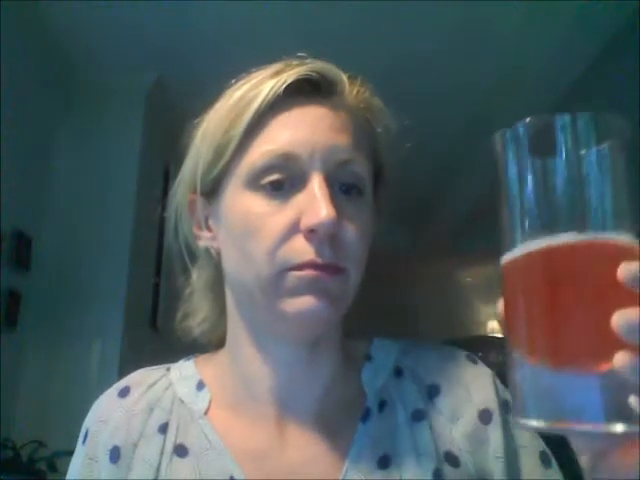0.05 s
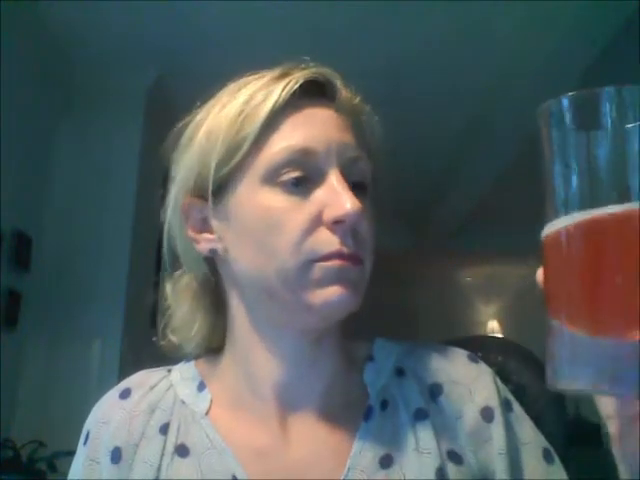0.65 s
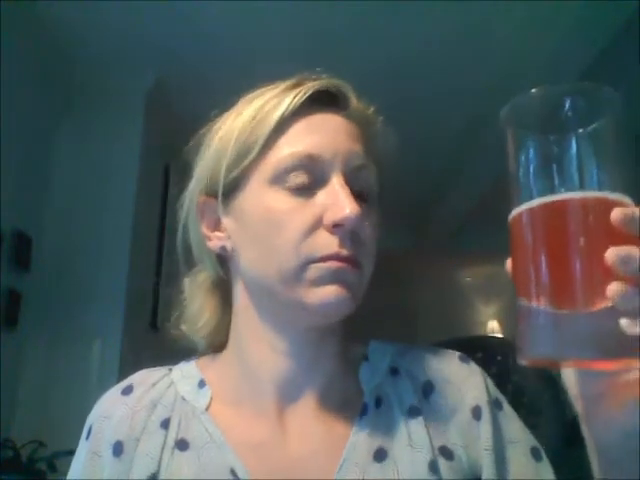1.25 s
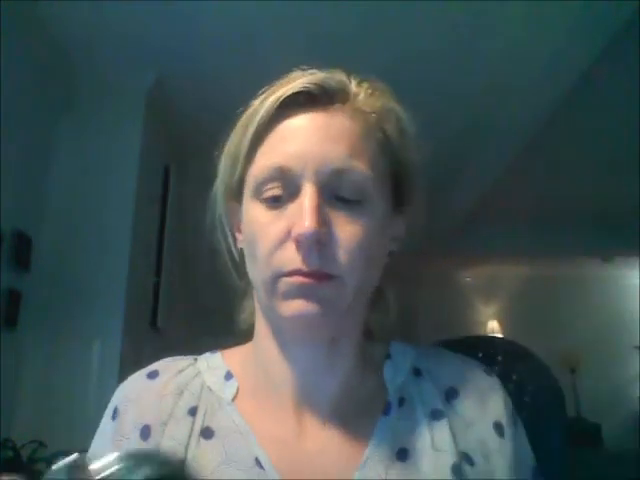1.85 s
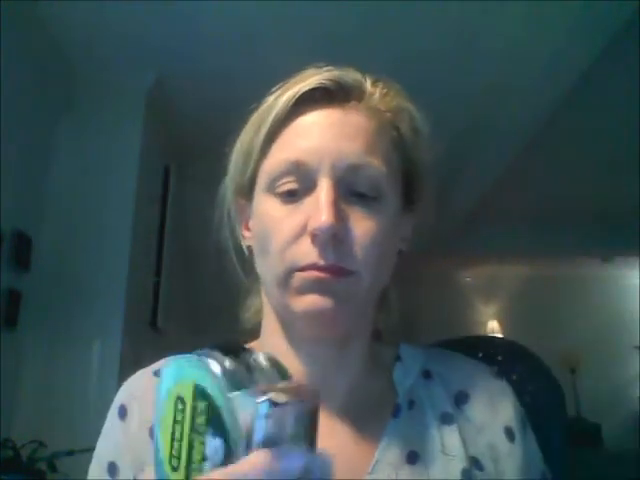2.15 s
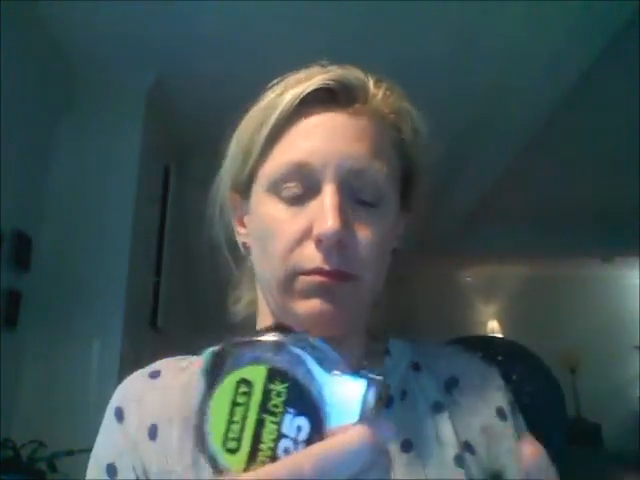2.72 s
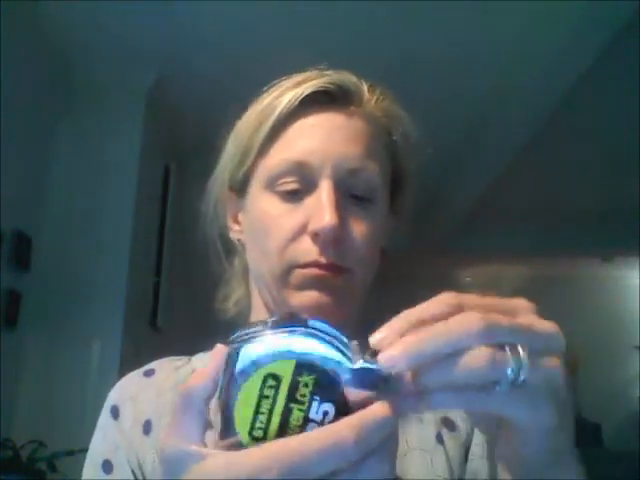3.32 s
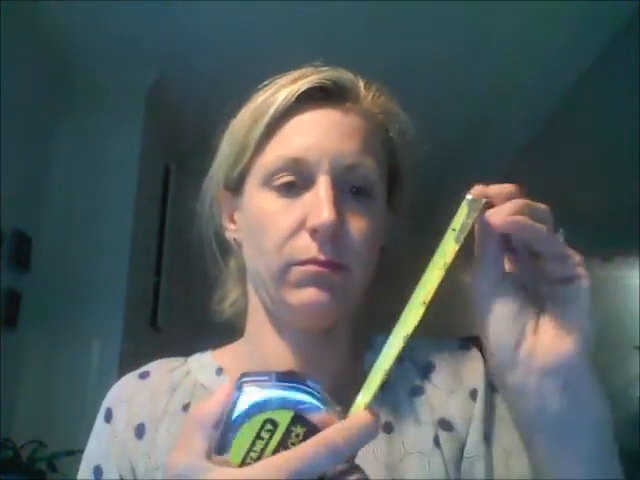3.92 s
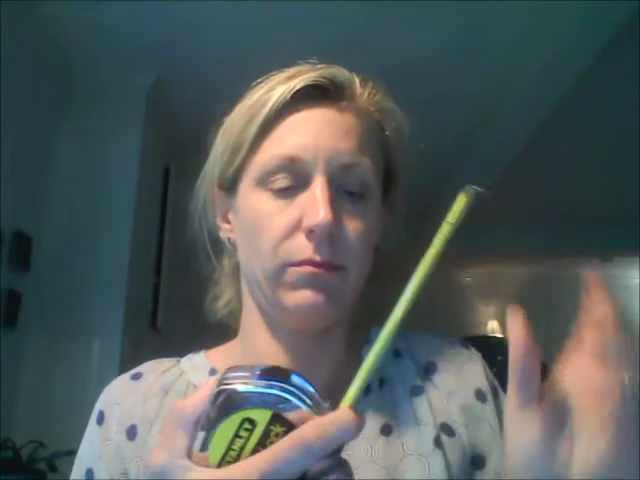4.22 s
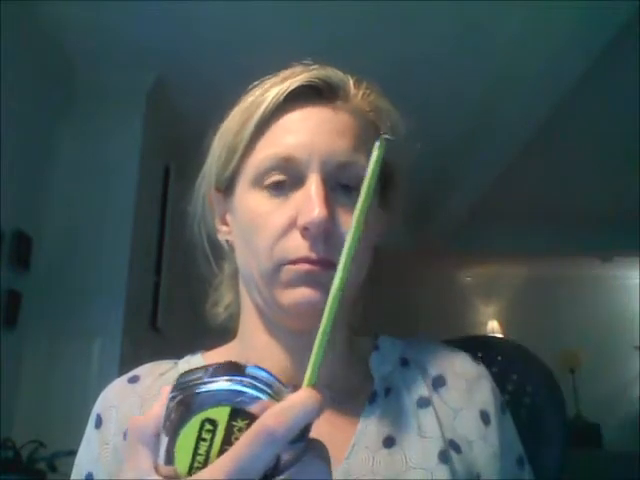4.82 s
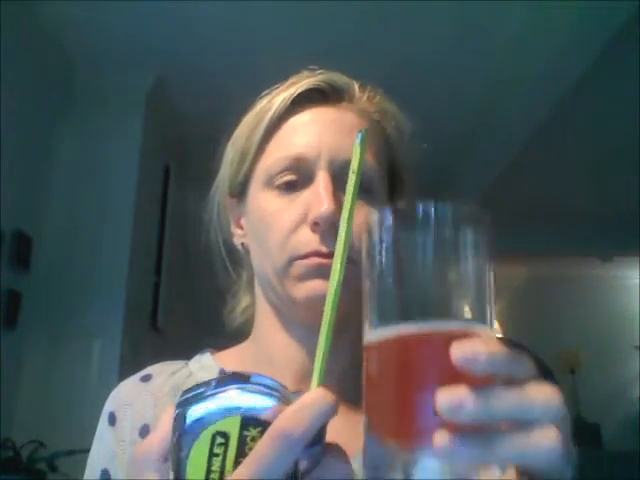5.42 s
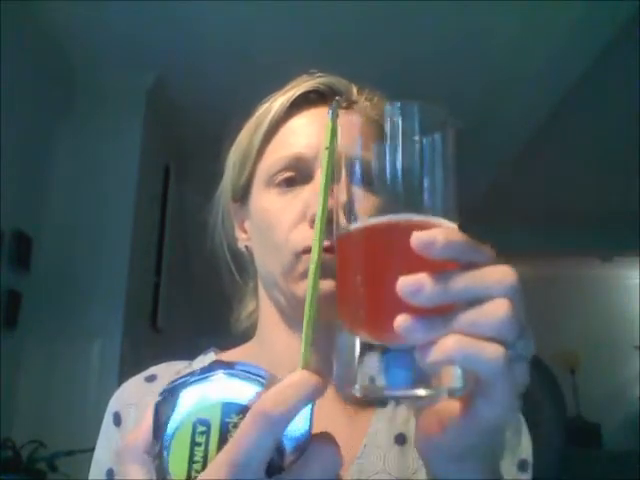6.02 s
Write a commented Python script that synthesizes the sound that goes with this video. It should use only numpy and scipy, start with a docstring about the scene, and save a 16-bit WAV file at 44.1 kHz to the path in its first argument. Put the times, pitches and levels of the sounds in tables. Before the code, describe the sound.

Close to a small computer microphone in a quiet room, light handling gives way to a loud double knock that briefly rings a table top. Next comes the rattling scrape of a metal tape measure being drawn out, with bright clacks and clicks. Things go nearly still, a lifted glass hums faintly, and the steel blade strikes it with a sharp clatter, followed by lighter taps and small squeaks.

```python
"""A steel tape measure handled at a table in a quiet room, close to a small computer microphone.
Fingers tick and brush; two heavy thumps ring the table top and the room (2.1, 2.3 s).
One pull draws the blade, scraping and clacking in the mouth of its case (3.2-4 s).
A drinking glass hums as it is lifted (5.3 s); the blade clatters, rubs and squeaks on it (5.7-6.1 s)."""
import sys
import numpy as np
from scipy import signal
from scipy.fft import rfft, irfft
from scipy.io import wavfile

SR = 44100
rng = np.random.default_rng(int(sys.argv[2]) if len(sys.argv) > 2 else 0)


def transcribe(signal):
    """Save signal, clipped to [-1, 1], as a 16-bit WAV file at the path in sys.argv[1]."""
    frames = np.atleast_2d(signal).T
    limited = np.clip(frames, -1, 1)
    pcm = np.round(limited * 32767).astype(np.int16)
    wavfile.write(sys.argv[1], SR, pcm)


N = 272139
TIME = np.arange(N) / SR
AGE = TIME[:SR // 2]

# blade knocks in the case mouth: t/s, case level/dB, case f/Hz, steel level/dB, steel f/Hz
CLACKS = [(3.2414, -47, 1100, -51.5, 3430), (3.2490, -37, 950, -47.5, 3200),
          (3.2560, -39.5, 950, -44, 3370), (3.346, -52.5, 1200, -51, 5340), (3.3535, -37, 1000, -43, 3160),
          (3.3865, -41, 1200, -51.5, 3400), (3.425, -48.5, 1000, -37.5, 3300),
          (3.4485, -38.5, 1100, -28, 4830), (3.455, -34, 750, -37.5, 3400), (3.49, -59.5, 1300, -31, 4600),
          (3.503, -56, 1300, -26, 3970), (3.5390, -16, 1900, -9.5, 5023), (3.5420, -21, 1700, -17.5, 4700),
          (3.564, -34, 850, -44.5, 3003), (3.74, -44.5, 2600, -43, 3600), (3.7516, -42, 2600, -29.5, 4900),
          (3.9770, -48, 1300, -56, 2794)]
# case and coiled blade: f/Hz, level/dB, t60/s
CASE_MODES = [(514, -13, 0.051), (586, -17.5, .16), (715, -12, 0.0606), (1457, -11.5, .024),
              (1842, -15, 0.2), (2140, -9.5, .025), (2270, -15.5, .075), (2980, -10.5, 0.12),
              (3270, -8, .035), (3570, -16.5, 0.18), (4200, -13, .035), (4460, -12, .03), (5000, -13, .037),
              (5580, -8.5, .05)]
# case mouth resonances: f/Hz, width/Hz, level/dB
MOUTH_BANDS = [(540, 170, 4.5), (733.4, 170, 0), (1467, 120, 0.5), (1755, 260, 7.5), (2040, 210, 0),
               (2890, 330, 4), (3280, 260, 4), (3577, 350, 1), (4236, 190, -0.5), (4600, 670, 1.5),
               (5067, 360, 0), (5870, 460, -3), (6250, 400, -6.5), (7000, 170, -6.5)]
# envelope of the pull: t/s, rattle gain/dB, zing gain/dB
PULL = [(3.33, -63.5, -72), (3.355, -52, -62), (3.40, -49, -55), (3.44, -41, -37), (3.468, -32.5, -40),
        (3.483, -43, -38.5), (3.494, -47, -28.5), (3.525, -42.5, -30), (3.552, -30, -28),
        (3.585, -43.5, -55.5), (3.70, -58, -62), (3.85, -75, -75.5)]
# flexing steel: f/Hz
ZING_HZ = [3230, 3580, 4400, 4620, 5010]
# lone partials of blade or glass: t/s, level/dB, f/Hz, t60/s
PINGS = [(1.389, -52, 4840, 0.11), (3.4478, -21.5, 2985, 0.058), (3.539, -18, 4580, 0.021),
         (3.539, -23.5, 680, 0.038), (3.551, -28, 5760, 0.082), (3.563, -29, 2870, 0.053),
         (3.703, -43, 2280, 0.18), (3.7515, -12.5, 3574, 0.022), (3.7555, -14, 3753, .024),
         (5.667, -27.5, 458, 0.12), (5.667, -18.5, 2072, 0.088), (5.695, -21, 2124, 0.19),
         (5.739, -41, 5260, 0.093), (5.815, -34, 1736, 0.16), (5.878, -32, 2230, .08),
         (5.96, -33, 1787, 0.057), (5.958, -39.5, 3850, 0.13), (5.96, -44, 4480, .09),
         (6.033, -36.5, 3107, 0.048)]
# blade taps on the glass: t/s, level/dB, centre f/Hz, relative crack level/dB, crack t60/s
GLASS_TAPS = [(5.6674, -20.5, 1710, -6.5, 0.034), (5.677, -11.5, 2500, 3, 0.0028),
              (5.687, -31, 1900, -5, 0.031), (5.6945, -17.5, 2570, -11.5, 0.054),
              (5.7003, -19.5, 2300, -10.5, .02), (5.7230, -29, 1310, -7, .03),
              (5.8143, -36.5, 2640, -4, 0.022), (5.8785, -47.5, 2330, 1, .009),
              (5.959, -35.5, 3160, -9, 0.037), (6.026, -33.5, 2280, -4, 0.017),
              (6.0317, -29.5, 3300, -1, 0.017)]
# glass and free blade: f/Hz, level/dB, t60/s
GLASS_MODES = [(455, -21, .08), (1045, -18, .12), (1320, -22, .12), (1523, -23, .11), (1756, -17, .14),
               (1900, -17, .08), (2071, -13, .07), (2112, -11, .12), (2215, -14, .11), (2318, -12, .13),
               (2800, -18, .05), (3092, -16, .08), (3283, -18, .05), (3703, -18, .06), (3900, -18, .06),
               (4530, -17, .05), (5215, -18, .11), (6585, -25, .06)]
# crack of steel on glass: f/Hz, relative density/dB
CRACK_SPECTRUM = [(280, -29.5), (450, 0), (650, -14), (1050, 7.5), (2300, -0.5), (3000, 0), (5500, 1),
                  (6100, 2.5), (7200, -6), (7800, -19.5)]
# blade drags on the glass: peak t/s, level/dB
RUBS = [(5.70, -45.5), (5.835, -41.5), (5.905, -57.5), (5.982, -44.5)]
# stick-slip on the glass: centre t/s, length/s, f/Hz, level/dB
SQUEAKS = [(1.45, 0.052, 1113, -56.5), (1.509, 0.039, 1080, -59.5), (5.679, 0.011, 2144, -11),
           (5.679, .014, 5280, -18), (5.696, 0.016, 5190, -18), (5.726, 0.018, 2290, -24.5),
           (5.855, 0.13, 1025, -42.5), (5.986, 0.021, 2228, -32), (6.04, 0.022, 5170, -29)]
# hum of the lifted glass: peak t/s, level/dB
LIFT_SWELLS = [(5.231, -56.5), (5.30, -49.5), (5.42, -64.5)]
# heavy thumps on the table, each a hollow knock with a quick repeat, then a low thud:
# t/s, knock level/dB, knock cut-off/Hz, knock f/Hz, repeat level/dB, repeat f/Hz, thud level/dB
THUMPS = [(2.1408, -5.5, 2287, 624.5, -12, 655, -14), (2.3137, -5.5, 1152, 590, -5.5, 665, -21.5)]
# soft bumps on the table: t/s, level/dB, f/Hz
BUMPS = [(2.131, -24, 737), (2.173, -28, 734), (2.322, -18.5, 197), (2.334, -15.5, 540),
         (2.375, -25.5, 195), (2.447, -37, 850), (2.454, -33.5, 200), (2.538, -42, 97.5),
         (2.820, -50.5, 540), (3.449, -40.5, 259), (4.424, -41.5, 128.4), (4.712, -47, 188)]
# table top: f/Hz, level/dB, t60/s
TABLE_MODES = [(125.5, -22, 0.22), (165, -22.5, .12), (203, -20, .22), (264, -31, 0.17), (345, -22.5, .12),
               (438, -24.5, 0.48), (490, -27.5, .2), (585.4, -23, .22), (675, -26.5, .11), (807, -35.5, .2),
               (877, -27.5, .15), (985, -24.5, .07), (1215, -22, .04), (1322, -22, 0.066),
               (1633, -24.5, .05), (2100, -32, .05)]
# things picked up: t/s, level/dB, centre f/Hz
TICKS = [(1.389, -51.5, 3700), (1.464, -49.5, 4500), (1.507, -49.5, 6700), (1.688, -56.5, 4160),
         (1.8464, -50.5, 3670), (2.082, -53, 4040)]
# fingers and sleeves: t/s, level/dB, centre f/Hz, t60/s
BRUSHES = [(1.314, -66, 1590, 0.76), (1.428, -56, 1500, .3), (1.506, -55.5, 2350, 0.19),
           (1.629, -63.5, 3580, .2), (2.142, -44, 2700, 0.14), (4.389, -62, 1780, .4)]
# room modes: f/Hz, width/Hz, gain/dB
ROOM_MODES = [(127, 15, -2), (974, 20, -4.5), (1335, 18, -9.5)]
# room decay: f/Hz, t60/s
ROOM_T60 = [(125, 0.57), (500, 0.35), (2000, 0.3), (7000, 0.075)]
# room drones: f/Hz, width/Hz, level/dB
DRONES = [(51.28, 20, -60), (120.6, 3.6, -63)]
# air noise: f/Hz, relative density/dB
AIR_SPECTRUM = [(20, -13.5), (90, -15.5), (120, -5.5), (150, -14.5), (210, -10.5), (330, -19.5),
                (750, -19.5), (1750, -27), (2050, -34), (6800, -35.5), (8000, -42)]


def clacks():
    """Each knock sounds hollow case and bright steel; softer knocks smear longer."""
    hollow, steel = [], []
    for s, case_db, case_hz, steel_db, steel_hz in CLACKS:
        crack_t60_s = .015 * 2 ** (-max(case_db, steel_db) / 30.5)
        hollow.append((s, case_db, case_hz, 1.3, -3, crack_t60_s))
        steel.append((s, steel_db, steel_hz, .24, -1.5, crack_t60_s))
    return (steel_hits(hollow, CASE_MODES, case_crack, grip_t60_s=.2, graze_db=-10, graze_s=.006)
            + steel_hits(steel, CASE_MODES, case_crack, grip_t60_s=.06, graze_db=-14.5, graze_s=.004))


def steel_hits(hits, modes, contact_noise, grip_t60_s, graze_db, graze_s):
    """The blade grazes, then catches with a crack and a ring; the hand damps the ring."""
    out = np.zeros(N)
    lead, attack, size = int(.03 * SR), int(.005 * SR), int(.16 * SR)
    for s, db, hz, octaves, crack_db, crack_t60_s in hits:
        grit = contact_noise(lead + size)
        crack = amp(crack_db) * grit[lead:] * fade(crack_t60_s, size)
        graze = amp(graze_db) * grit[:lead] * np.exp(-AGE[:lead] / graze_s)[::-1]
        body = ring(modes, loose=True, size=size) * fade(grip_t60_s, size)
        hit = band(np.concatenate([graze, crack + body]), hz, octaves, order=2)
        add(out, s - lead / SR, amp(db) * hit / np.std(hit[lead:lead + attack]))
    return out


def scrape():
    """Sliding blade: friction rattles case and mouth, catches ring the steel, creep hisses."""
    friction = slips(per_s=700, spread_db=4.5)
    force = lowpass(friction, 3200) + amp(-1.5) * band(friction, 580, octaves=1)
    rattle = amp(-7) * rubbed(force, CASE_MODES, damping_hz=35.86) + amp(-6) * mouth(friction)
    catches = slips(per_s=800, spread_db=3)
    zing = unit(sum(resonate_twice(catches, hz, width_hz=160) for hz in ZING_HZ))
    creep = slips(per_s=3000, spread_db=2.5)
    creep_in_case = rubbed(band(creep, 2100, octaves=.3), CASE_MODES, damping_hz=40)
    hiss = unit(unit(band(creep, 5200, octaves=.47)) + creep_in_case)
    times_s, *levels_db = np.transpose(PULL)
    rattle_gain, zing_gain = [amp(np.interp(TIME, times_s, db, -np.inf, -np.inf)) for db in levels_db]
    hiss_gain = swell(peak_s=3.5, db=-43.5, rise_db_per_s=130, fall_db_per_s=80)
    return rattle_gain * rattle + zing_gain * zing + hiss_gain * hiss


def mouth(force):
    """Case mouth: steep resonances, deep valleys; rms 1."""
    return unit(sum(amp(db) * resonate_twice(force, hz, width_hz) for hz, width_hz, db in MOUTH_BANDS))


def case_crack(size):
    """Contact noise, steel on case."""
    run_in = SR // 100
    return mouth(rng.standard_normal(size + run_in))[run_in:]


def pings():
    """Blade or glass rings on at a pitch set by the struck spot."""
    out = np.zeros(N)
    attack = 1 - np.exp(-(AGE / .0012) ** 2)
    for s, db, hz, t60_s in PINGS:
        add(out, s, amp(db) * wavering_tone(hz, len(AGE)) * fade(t60_s) * attack)
    return out


def clatter(gap_s=.0055, loss_db=10.5):
    """The springy blade touches the glass three times a tap, each touch weaker."""
    hits = []
    for s, db, hz, crack_db, crack_t60_s in GLASS_TAPS:
        octaves = max(5.4 + .27 * db, 1)
        for bounce, jitter in enumerate(rng.uniform(.8, 1.2, 3)):
            touch_db = db - loss_db * bounce
            hits.append((s + gap_s * bounce * jitter, touch_db, hz, octaves, crack_db, crack_t60_s))
    return steel_hits(hits, GLASS_MODES, glass_crack, grip_t60_s=.29, graze_db=-19.5, graze_s=.0045)


def glass_crack(size):
    """Contact noise, steel on glass."""
    return noise(CRACK_SPECTRUM, size)


def rubbing():
    """The blade drags grittily on the glass and drives its lower modes."""
    pressure = sum(swell(s, db, rise_db_per_s=474.5, fall_db_per_s=205.5) for s, db in RUBS)
    friction = slips(per_s=2000, spread_db=-3.5)
    ringing = rubbed(band(friction, 1100, octaves=1, order=2), GLASS_MODES, damping_hz=10)
    grit = amp(-14) * unit(band(friction, 5400, octaves=.84))
    return pressure * (ringing + grit)


def squeaks():
    """Fingers or blade edge stick and slip on the glass: brief tones."""
    out = np.zeros(N)
    for s, length_s, hz, db in SQUEAKS:
        window = signal.windows.cosine(int(length_s * SR))
        add(out, s - length_s / 2, amp(db) * window * wavering_tone(hz, len(window)))
    return out


def lifted_glass():
    """One narrow, hollow resonance stirred by the hand."""
    hum = unit(resonate_twice(rng.standard_normal(N), hz=457, width_hz=41.2))
    return hum * sum(swell(s, db, rise_db_per_s=277, fall_db_per_s=184.5) for s, db in LIFT_SWELLS)


def table_blows(thud_hz=346.7, cutoff_ratio=1.5):
    """Thumps (knock, quick repeat, low thud), then bumps: t/s, level/dB, cut-off/Hz, f/Hz."""
    blows = []
    for s, knock_db, cutoff_hz, knock_hz, repeat_db, repeat_hz, thud_db in THUMPS:
        blows += [(s, knock_db, cutoff_hz, knock_hz),
                  (s + .0081, repeat_db, 950, repeat_hz),
                  (s + .012, thud_db, cutoff_ratio * thud_hz, thud_hz)]
    return blows + [(s, db, cutoff_ratio * hz, hz) for s, db, hz in BUMPS]


def table_thumps(rise_cycles=2.3):
    """A hollow knock, then the top rings; soft contacts reach only the low modes."""
    out = np.zeros(N)
    for s, db, cutoff_hz, knock_hz in table_blows():
        rise = AGE * knock_hz / rise_cycles
        knock = (rise * np.exp(1 - rise)) ** 3 * np.sin(2 * np.pi * knock_hz * AGE)
        top = amp(4.5) * ring(TABLE_MODES, loose=False) * (1 - np.exp(-AGE / .00027))
        add(out, s, amp(db) * lowpass(knock + top, cutoff_hz))
    return out


def handling():
    """Dry ticks of things picked up; longer brushes of fingers and sleeves."""
    out = np.zeros(N)
    for s, db, hz in TICKS:
        tick = unit(band(rng.standard_normal(len(AGE)), hz, octaves=.26))
        add(out, s, amp(db) * tick * fade(t60_s=.03))
    for s, db, hz, t60_s in BRUSHES:
        brush = unit(band(rng.standard_normal(len(AGE)), hz, octaves=.44))
        add(out, s, amp(db) * brush * fade(t60_s))
    return out


def boom(thumps, delay_s=.03):
    """Room modes swell after each thump and outlast it."""
    out = np.zeros(N)
    for hz, width_hz, db in ROOM_MODES:
        add(out, delay_s, amp(db) * resonate(resonate(thumps, hz, width_hz), hz, 2 * width_hz))
    return out


def room(x, wet_db):
    """Direct sound plus a diffuse tail; treble dies first."""
    tail = sum(band(rng.standard_normal(len(AGE)), hz, octaves=.5, order=2) * fade(at_hz(ROOM_T60, hz))
               for hz in 90 * 2. ** np.arange(7))
    tail *= 1 - np.exp(-AGE / .0033)
    return x + amp(wet_db) * signal.fftconvolve(x, tail / np.linalg.norm(tail))[:N]


def room_tone():
    """Faint air noise over low, unevenly swelling drones."""
    drift = amp(1.5 * unit(band(rng.standard_normal(N), hz=5, octaves=1, order=2)))
    drones = np.zeros(N)
    for hz, width_hz, db in DRONES:
        drive = band(rng.standard_normal(N), hz, octaves=.53)
        drones += amp(db) * unit(drift * resonate(drive, hz, width_hz))
    return drones + amp(-62) * noise(AIR_SPECTRUM, N)


def ring(modes, loose, size=None):
    """Struck body; a loose part lands on a new spot each time, so modes start out of step."""
    scatter_db = (3 if loose else 1.5) * rng.standard_normal(len(modes))
    phases = loose * rng.uniform(0, 2 * np.pi, len(modes)) + np.pi * np.arange(len(modes))
    return sum(amp(db + offset_db) * np.sin(2 * np.pi * hz * AGE[:size] + phase) * fade(t60_s, size)
               for (hz, db, t60_s), offset_db, phase in zip(modes, scatter_db, phases))


def slips(per_s, spread_db):
    """Friction: dense tiny slips of uneven size."""
    impulses = (rng.random(N) < per_s / SR) * rng.choice([-1, 1], N)
    return impulses * amp(spread_db * np.minimum(rng.exponential(1, N), 4))


def rubbed(force, modes, damping_hz):
    """Body under friction; long-ringing modes gather most; rms 1."""
    return unit(sum(resonate(force, hz, damping_hz + 2 / t60_s) * amp(db) * t60_s
                    for hz, db, t60_s in modes))


def wavering_tone(hz, size, waver_hz=45, waver_db=2, waver_rad=.25):
    """One partial; the loose blade unsettles level and pitch."""
    level, phase = [unit(lowpass(rng.standard_normal(SR), waver_hz))[-size:] for _ in range(2)]
    return amp(waver_db * level) * np.sin(2 * np.pi * hz * AGE[:size] + waver_rad * phase)


def swell(peak_s, db, rise_db_per_s, fall_db_per_s):
    """Gain of a stroke that rises and dies away."""
    before_s, after_s = np.maximum(peak_s - TIME, 0), np.maximum(TIME - peak_s, 0)
    return amp(db - rise_db_per_s * before_s - fall_db_per_s * after_s)


def fade(t60_s, size=None):
    """Free decay."""
    return np.exp(-np.log(1000) * np.minimum(AGE[:size] / max(t60_s, .002), 3))


def noise(spectrum, size):
    """Coloured noise, rms 1."""
    gain = amp(at_hz(spectrum, np.fft.rfftfreq(size, 1 / SR)))
    return unit(irfft(rfft(rng.standard_normal(size)) * gain, size))


def at_hz(points, hz):
    """Table lookup on a log-frequency axis."""
    points_hz, values = np.transpose(points)
    return np.interp(np.log(hz + 1), np.log(points_hz), values)


def resonate(x, hz, width_hz):
    """One resonance, peak gain 1."""
    radius = np.exp(-np.pi * width_hz / SR)
    feedback = [1, -2 * radius * np.cos(2 * np.pi * hz / SR), radius ** 2]
    return signal.lfilter(np.array([1, 0, -1]) * (1 - radius ** 2) / 2, feedback, x + 1e-18)


def resonate_twice(x, hz, width_hz):
    return resonate(resonate(x, hz, width_hz), hz, width_hz)


def band(x, hz, octaves, order=1):
    """Band-pass, `octaves` to each side."""
    edges_hz = [hz / 2 ** octaves, min(hz * 2 ** octaves, .45 * SR)]
    return signal.sosfilt(signal.butter(order, edges_hz, "band", fs=SR, output="sos"), x + 1e-18)


def lowpass(x, hz):
    return signal.sosfilt(signal.butter(2, hz, fs=SR, output="sos"), x)


def low_cut(x, hz):
    """A body radiates little below its lowest mode."""
    return signal.sosfilt(signal.butter(4, hz, "high", fs=SR, output="sos"), x + 1e-18)


def amp(db):
    return 10 ** (np.asarray(db) / 20)


def unit(x):
    """Scale to rms 1."""
    return x / np.sqrt(np.mean(x ** 2) + 1e-20)


def add(track, s, sound):
    start = int(s * SR)
    track[start:start + len(sound)] += sound[:N - start]


def scene():
    """Table, tape and glass in one small room; mono."""
    thumps = low_cut(table_thumps(), hz=67.4)
    tape = low_cut(clacks() + scrape() + pings(), hz=377.7)
    glass = low_cut(clatter() + rubbing() + squeaks(), hz=357) + lifted_glass()
    mix = room(thumps, wet_db=-18) + boom(thumps)
    mix += room(tape + handling(), wet_db=-25.5)
    mix += room(glass, wet_db=-24.5)
    return (mix + room_tone())[None]


def record(dry):
    """Microphone: band-limited, clips the highest peaks."""
    cutoff_hz, overload = 7600, .85
    cut = signal.butter(20, cutoff_hz, fs=SR, output="sos")
    clipped = np.clip(signal.sosfilt(cut, dry), -overload, overload)
    return signal.sosfiltfilt(cut, clipped)


dry = scene()
out = record(dry)
transcribe(out)
```